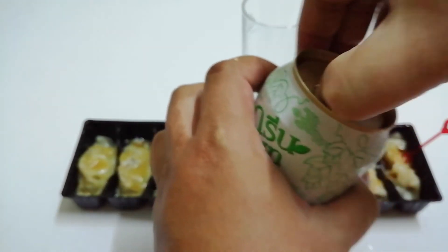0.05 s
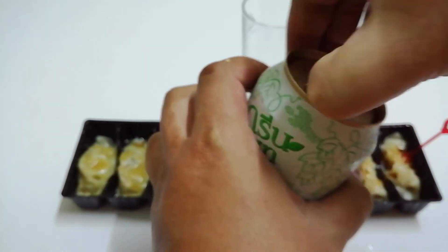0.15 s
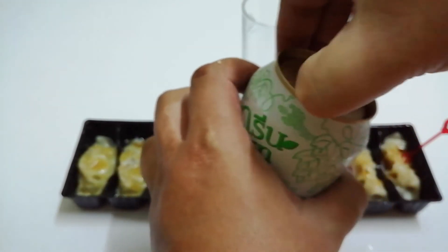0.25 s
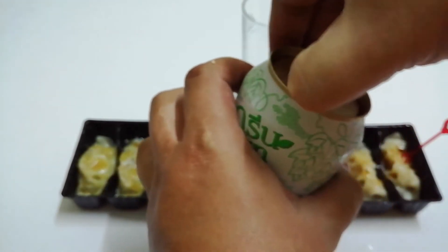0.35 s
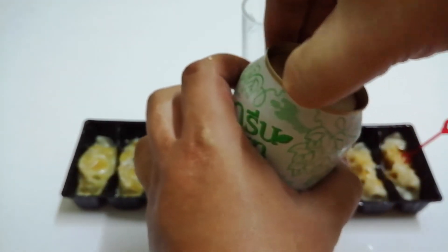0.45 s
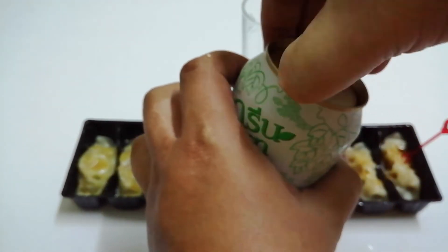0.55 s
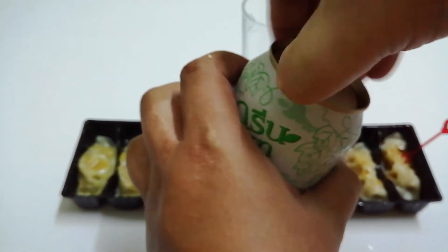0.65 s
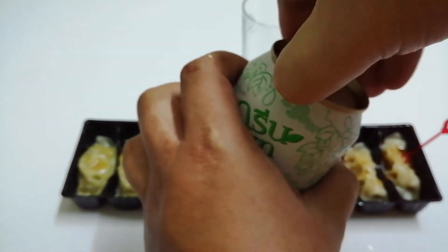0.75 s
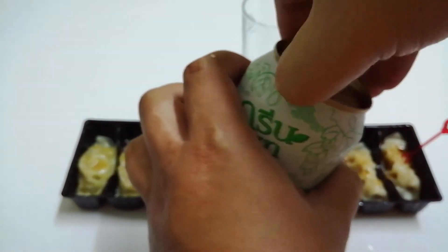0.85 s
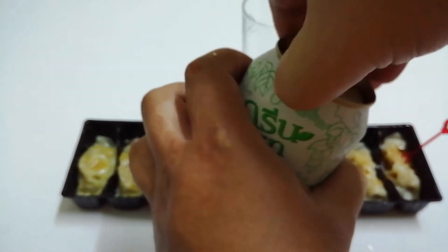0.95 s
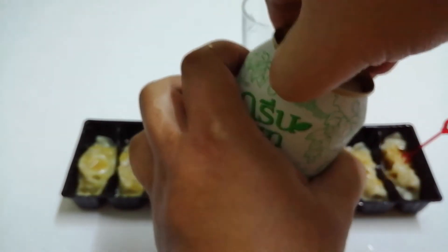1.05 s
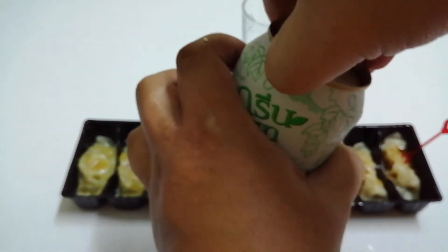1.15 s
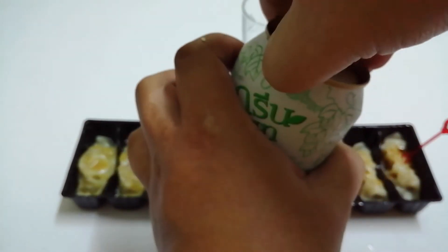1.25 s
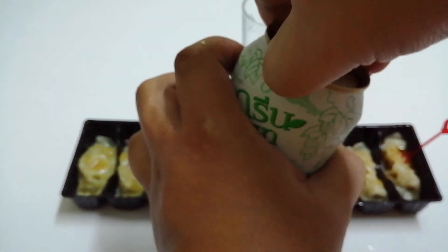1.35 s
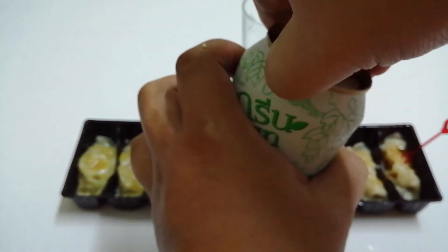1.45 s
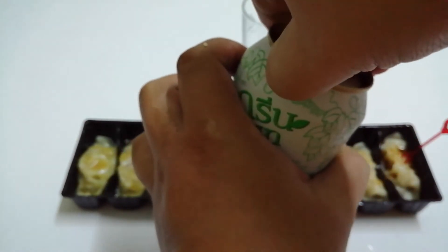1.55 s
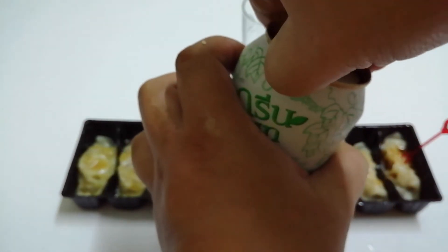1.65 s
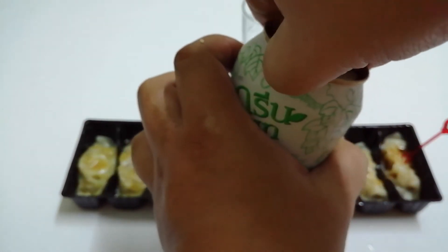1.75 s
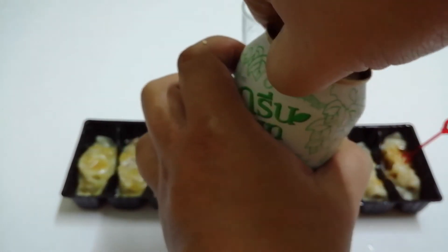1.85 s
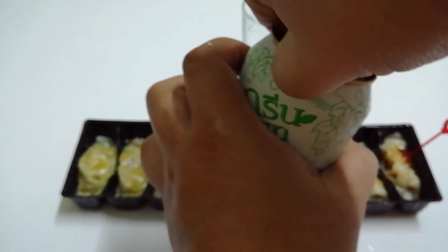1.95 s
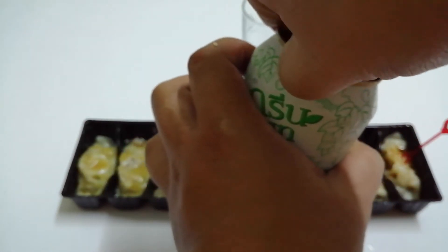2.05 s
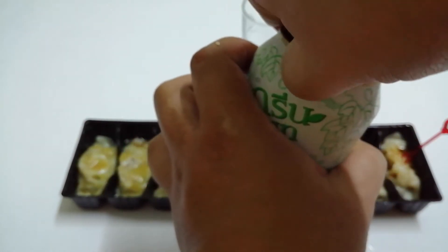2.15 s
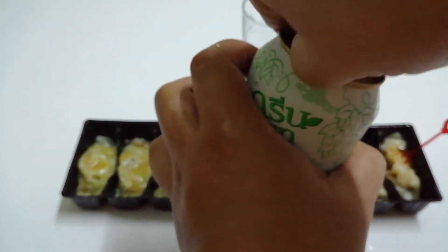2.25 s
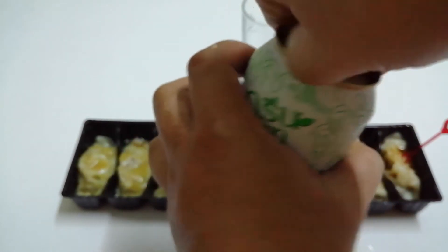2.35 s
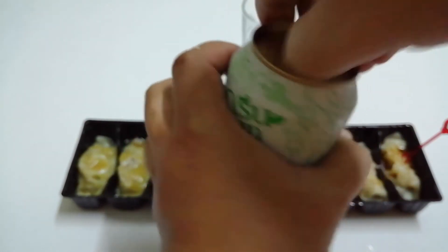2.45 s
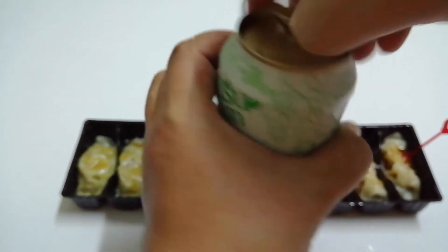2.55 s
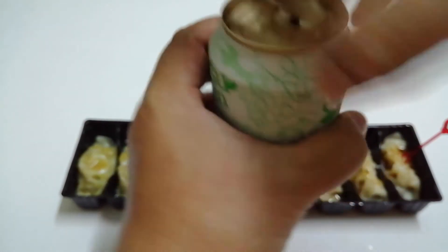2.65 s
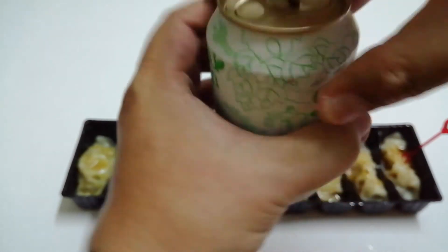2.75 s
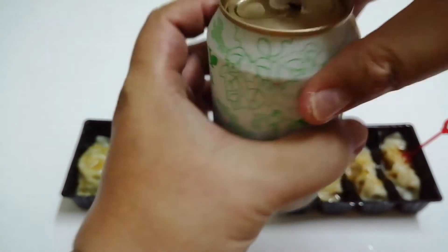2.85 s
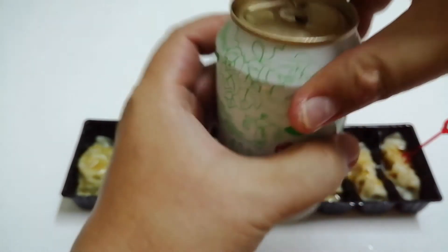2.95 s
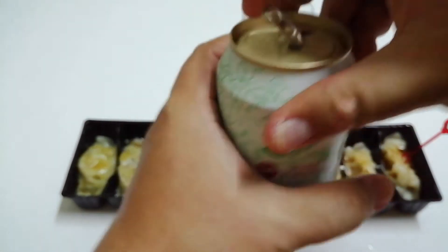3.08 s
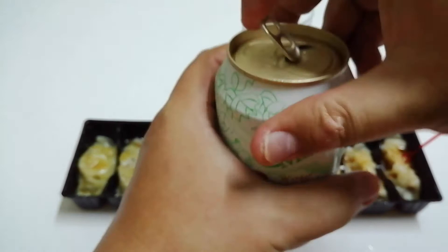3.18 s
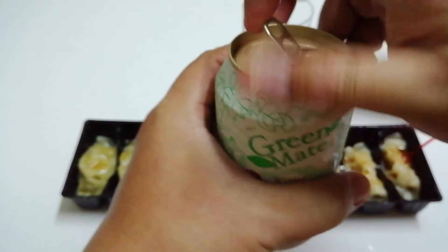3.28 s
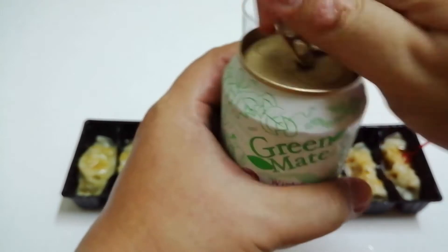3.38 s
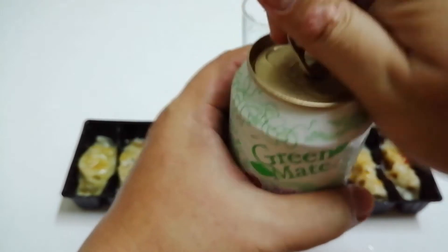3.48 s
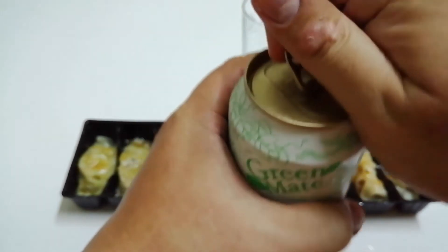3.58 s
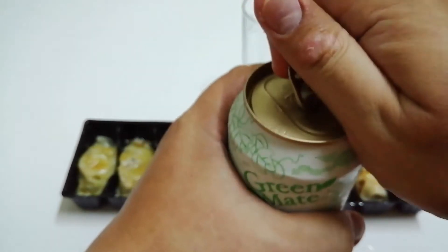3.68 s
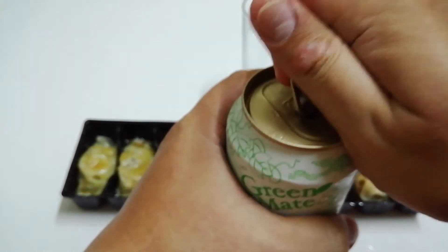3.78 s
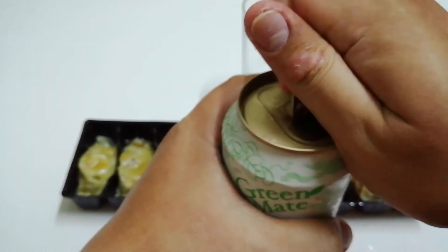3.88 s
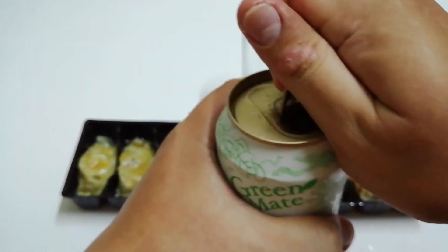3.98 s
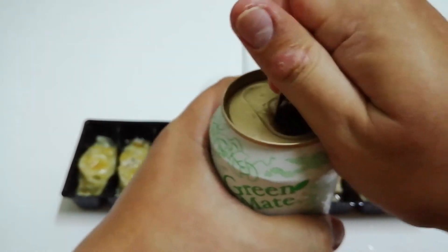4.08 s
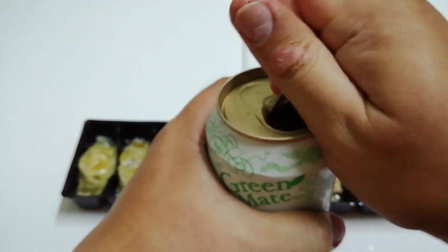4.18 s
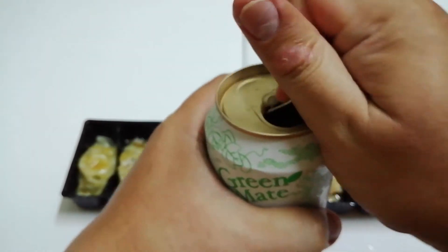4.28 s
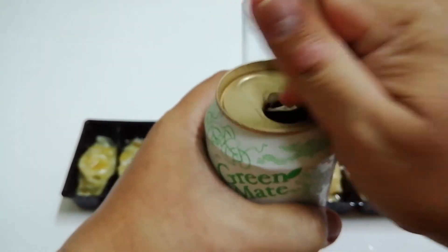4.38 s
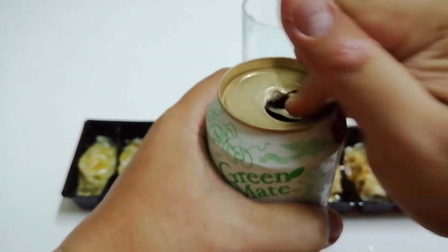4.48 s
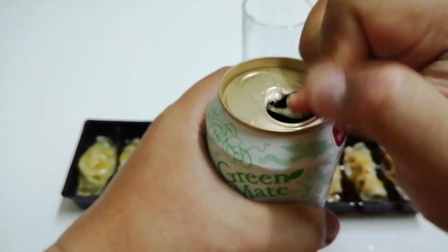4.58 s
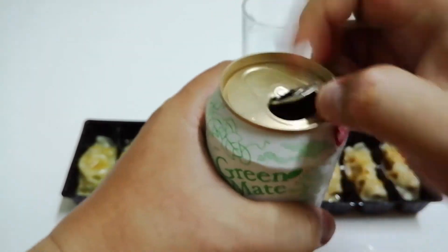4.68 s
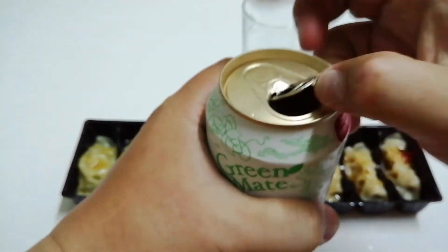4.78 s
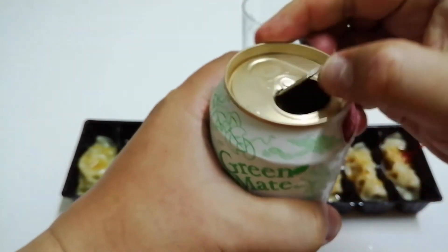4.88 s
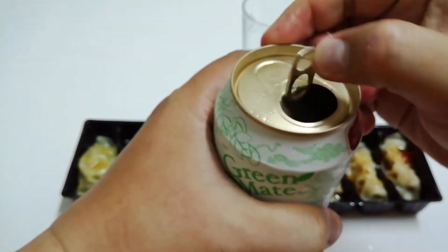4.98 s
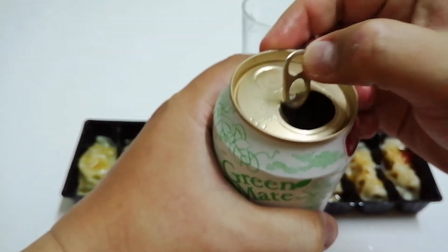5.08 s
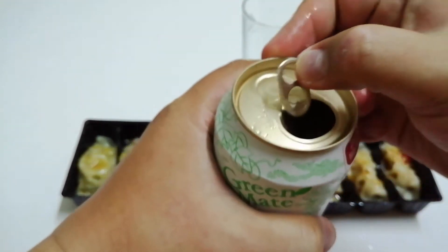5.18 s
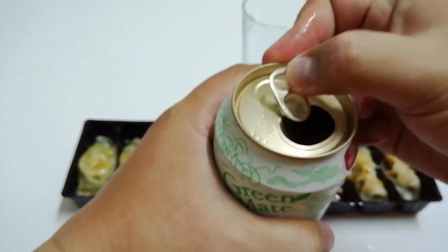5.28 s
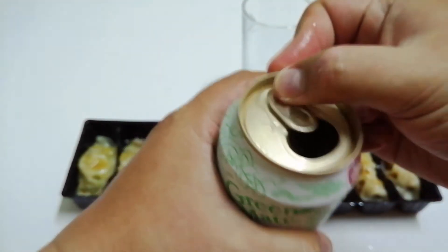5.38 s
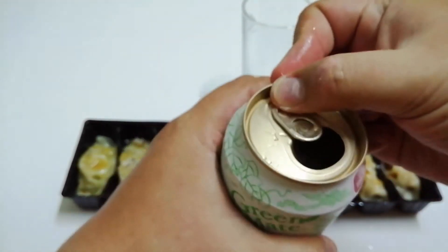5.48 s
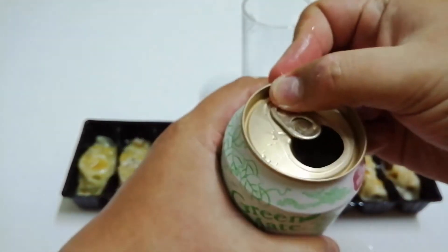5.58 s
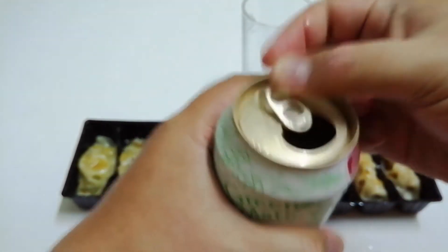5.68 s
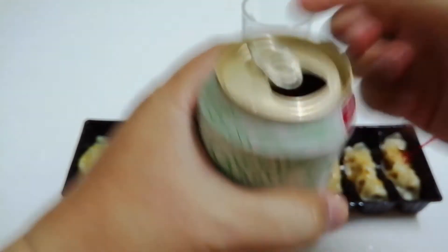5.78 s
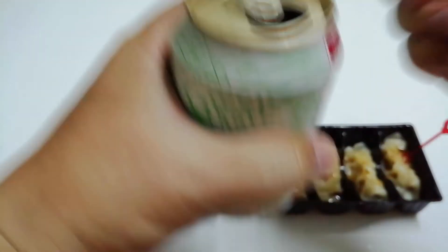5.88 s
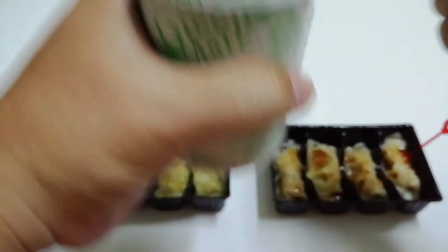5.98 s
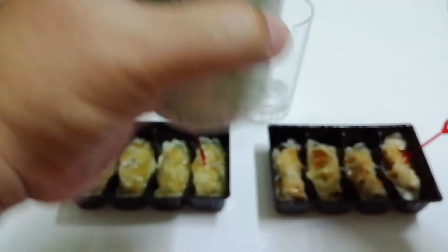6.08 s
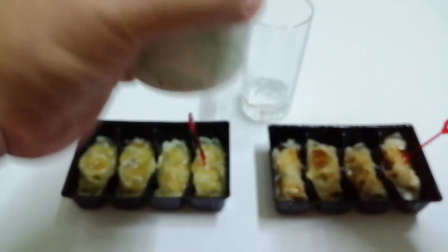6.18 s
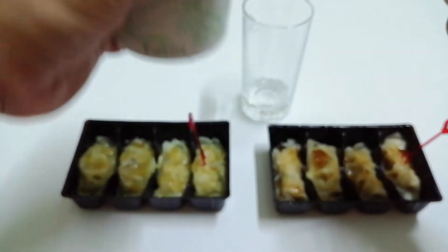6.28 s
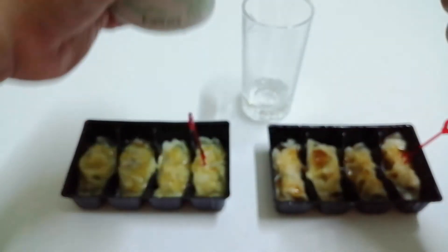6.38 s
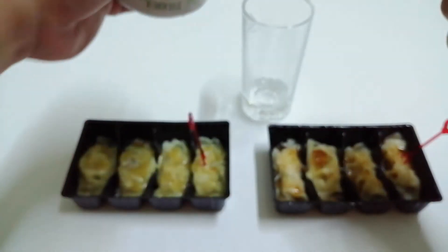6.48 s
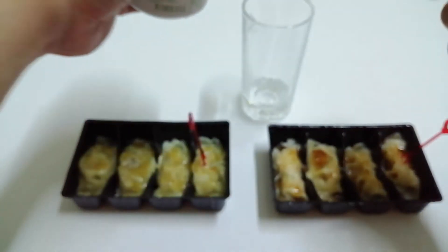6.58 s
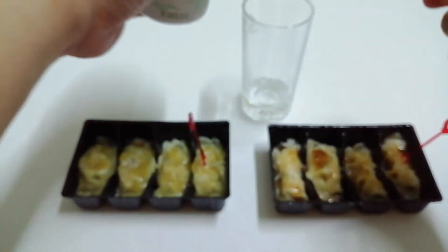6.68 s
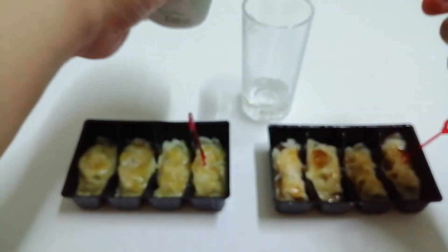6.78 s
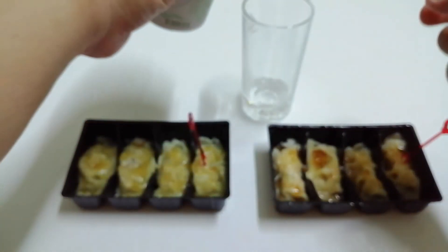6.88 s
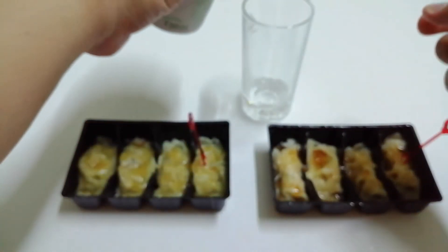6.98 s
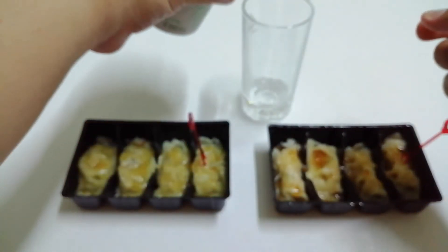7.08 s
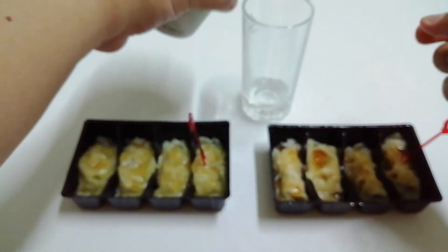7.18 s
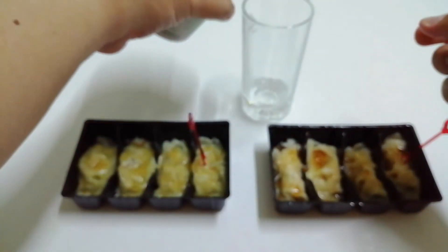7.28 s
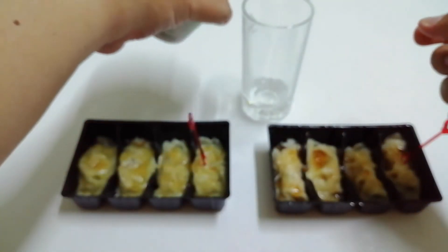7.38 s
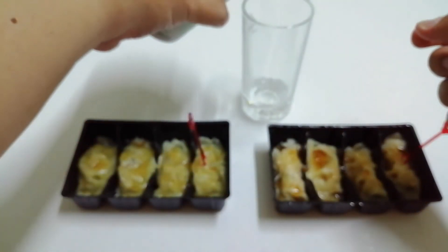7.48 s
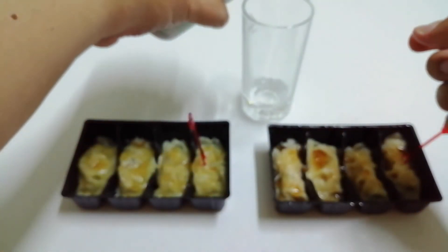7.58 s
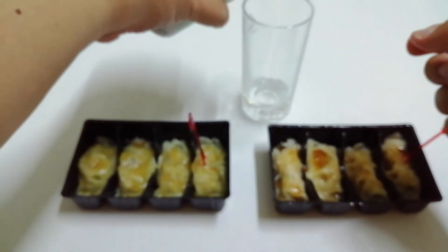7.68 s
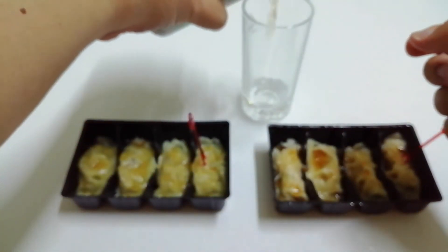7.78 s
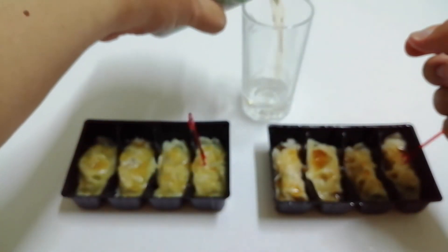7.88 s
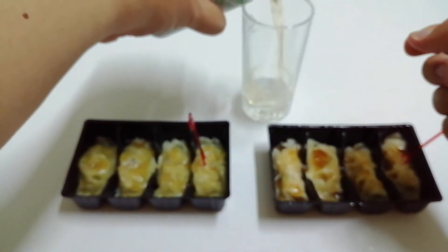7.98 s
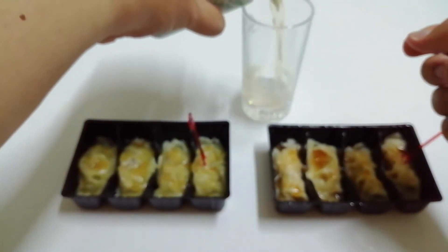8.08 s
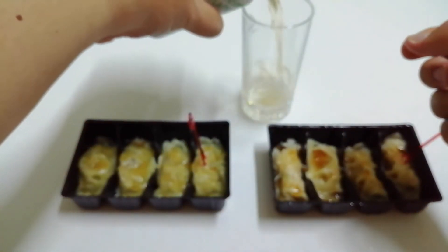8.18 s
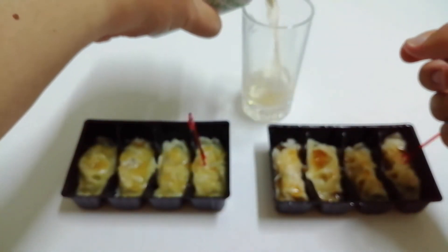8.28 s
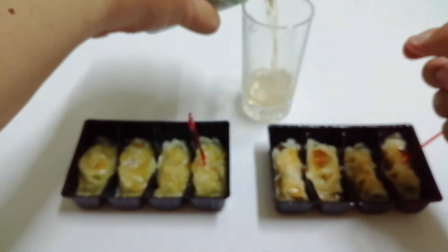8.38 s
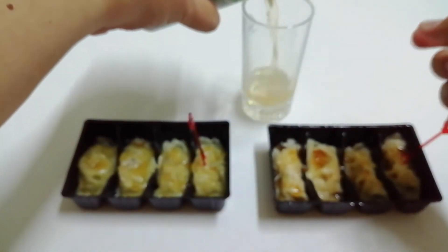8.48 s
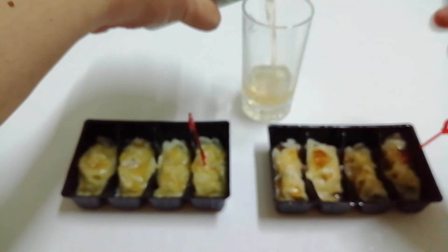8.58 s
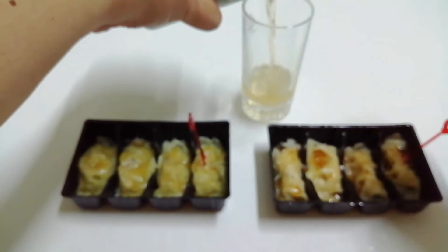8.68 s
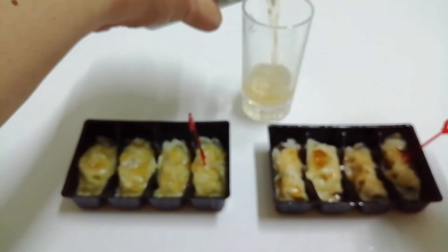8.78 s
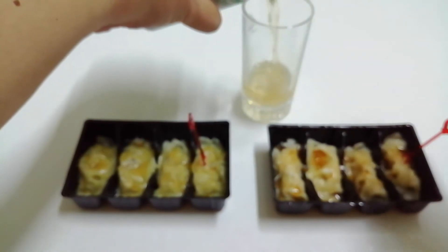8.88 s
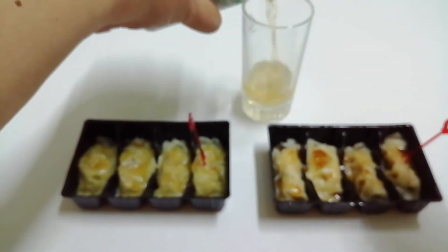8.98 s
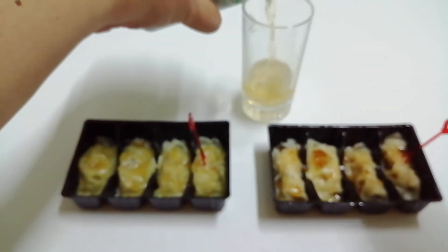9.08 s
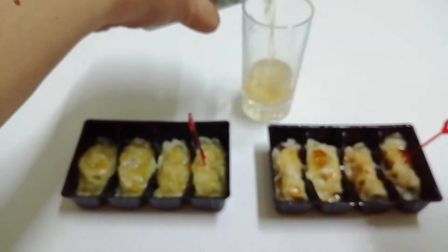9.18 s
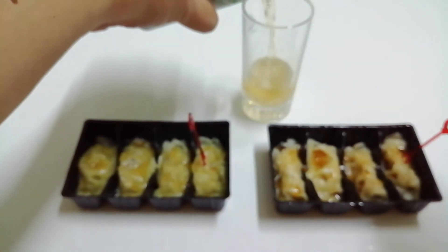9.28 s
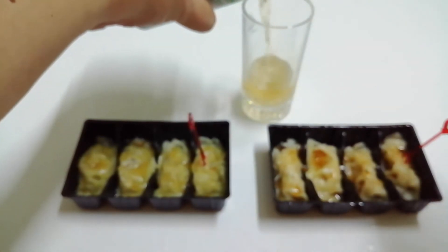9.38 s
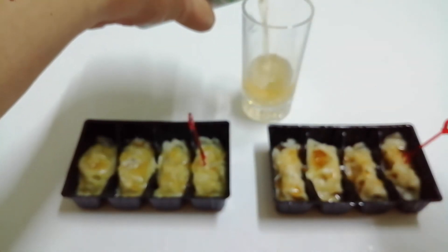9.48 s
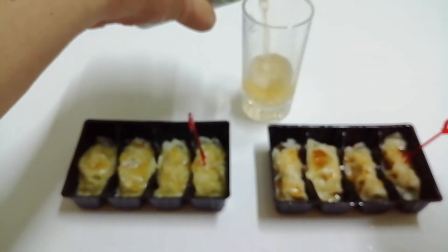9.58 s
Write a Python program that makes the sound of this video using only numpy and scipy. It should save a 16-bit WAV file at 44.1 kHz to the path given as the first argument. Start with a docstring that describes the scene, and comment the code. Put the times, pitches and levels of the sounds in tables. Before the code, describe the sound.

A drink can's seal snaps with a loud double pop and gas spurt, its lid tears open, then liquid glugs and splashes into a glass.

```python
"""Fingers work the ring tab of a drink can: noise bursts excite the lid's resonances, and each also rings
the air pocket. The seal pops twice with gas jets of shaped noise, then the lid tears in small cracks and rasps.
The drink glugs out as swelling sines and splashes into a tall glass as decaying bubble tones, noise splats
and fizz. Filtered-noise hum and hiss lie underneath, and decaying noise tails answer as a small quiet room."""
import sys
import numpy as np
from scipy import signal
from scipy.fft import rfft, irfft, next_fast_len
from scipy.io import wavfile
from scipy.ndimage import map_coordinates

SR = 44100
rng = np.random.default_rng(int(sys.argv[2]) if len(sys.argv) > 2 else 0)


def natural_amplitude(level_db):
    """Convert a level in decibels to a linear amplitude factor, elementwise."""
    exponent = np.asarray(level_db, float) / 20
    return 10 ** exponent


def master(y):
    """Save y as 16-bit WAV."""
    cut = np.clip(np.atleast_2d(y).T, -1, 1)
    pcm = np.round(cut * 32767)  # scale
    wavfile.write(sys.argv[1], SR, pcm.astype(np.int16))


N = 425124
T = np.arange(N) / SR  # time in s

# The seal gives. Each row: start in seconds, crack level in dB, left over right in dB,
# pressure thump level in dB, gas jet level in dB.
SEAL_POPS = [(2.2242, 1.5, 7, -18.5, -21.5), (2.2736, -5, 11.5, -26, -23.5)]
# The pouring stream. Each row: time in seconds, nominal spray level in dB, nominal gurgle level in dB.
POUR_STREAM = [(8.059, -76.5, -72), (8.202, -57, -111), (8.441, -49.5, -45.5), (8.55, -49.5, -40),
               (8.83, -45.5, -30.5), (8.97, -53.5, -43), (9.139, -49.5, -45), (9.261, -44, -40.5),
               (9.4, -51.5, -46.5), (9.519, -45.5, -42), (9.64, -48.5, -37.5)]
# Spectrum of the spray. Each row: frequency in Hz, relative spectral density in dB.
SPRAY_SPECTRUM = [(710, -68), (1200, -6), (1720, -12.5), (2600, -3), (4130, -11), (5900, 0.5), (7490, -14),
                  (9310, -4), (15000, -18), (16000, -26)]
# Resonances of the filling glass and table. Each row: centre in Hz, single-pass width in Hz, relative level in dB.
GLASS_MODES = [(112, 75, -1), (257, 50, 3.5), (507, 157, 1), (966, 93, 7), (1268, 120, -3)]
SMALL_HZ = 2204  # base pitch of the small drops


def unit(x):
    """Normalisation: scales a signal to rms 1."""
    return x / np.sqrt(np.mean(x ** 2) + 1e-20)


def along(points, hz):
    """Logarithmic frequency scale: interpolates (Hz, value) points along it."""
    f, v = np.transpose(points)
    return np.interp(np.log(hz + 1), np.log(f + 1), v)


def gains(rows):
    """Amplitude envelopes: one gain per sample for each dB column, practically silent outside the rows."""
    s, *columns = np.transpose(rows)
    return [natural_amplitude(np.interp(T, s, column, -150, -150)) for column in columns]


def wobble(rate):
    """Band-limited fluctuation: a smooth random curve with rate knots a second."""
    return map_coordinates(rng.standard_normal(int(N * rate / SR) + 4), [T * rate])


def flutter(depth, rate, size):
    """Amplitude modulation: fast random swells about 1 that blur a pure ring."""
    knots = rng.standard_normal(int(size * rate / SR) + 4)
    return 1 + depth * map_coordinates(knots, [T[:size] * rate])


def filtered(x, response):
    """Linear filtering: multiplies the spectrum by a complex response of frequency."""
    m = next_fast_len(x.shape[-1] + 8192)
    return irfft(rfft(x, m) * response(np.fft.rfftfreq(m, 1 / SR)), m)[..., :x.shape[-1]]


def peaks(table):
    """Modal superposition: causal second-order resonances summed with alternating sign."""
    def response(f):
        total = 0
        for k, (centre, width, db) in enumerate(table):
            damping = 1j * f * width
            total = total + (-1) ** k * natural_amplitude(db) * damping / (centre * centre - f * f + damping)
        return total
    return response


def steep(table):
    """Cascaded resonance: each mode acts twice, leaving deep valleys between modes."""
    return lambda f: sum(natural_amplitude(db) * peaks([(c, w, 0)])(f) ** 2 for c, w, db in table)


def pair(alike):
    """Interaural coherence: stereo noise whose left-right likeness depends on frequency."""
    def mid_side(hz):
        turn = np.arccos(np.clip(along(alike, hz), -1, 1)) / 2
        return np.array([np.cos(turn), np.sin(turn)])
    mid, side = filtered(rng.standard_normal((2, N)), mid_side)
    return np.array([mid + side, mid - side])


def coloured(x, spectrum):
    """Spectral shaping: imposes a (Hz, dB) spectrum, then scales to rms 1."""
    return unit(filtered(x, lambda hz: natural_amplitude(along(spectrum, hz))))


def ring(hz, t60, rise, t):
    """Damped free vibration: a decaying sine with a soft start, peak near 1."""
    shape = natural_amplitude(-60 * t / t60) * (1 - np.exp(-t / rise))
    return shape / shape.max() * np.sin(2 * np.pi * hz * t)


def add(out, s, x, pan_db):
    """Superposition: mixes a sound in at a time, with a left-over-right level difference."""
    k = round(s * SR)
    out[:, k:k + x.shape[-1]] += (x * natural_amplitude([[pan_db / 2], [-pan_db / 2]]))[:, :N - k]


def sparks(rate, spread_db, alike):
    """Poisson-like impulse noise: random stereo impulses with a long tail of sizes."""
    size = (rng.random(N) < rate / SR) * natural_amplitude(spread_db * rng.exponential(size=N))
    return size * pair([(1000, alike)])


def bubbles(rate, centre_hz, spread, cycles, size_db):
    """Bubble resonance: many short damped tones, each rising a little, each on its own side."""
    start = POUR_STREAM[0][0] * SR / N
    count = int(rate * (1 - start) * N / SR)
    at, pitch, size, side = rng.random((4, count))
    hz = np.clip(centre_hz * np.exp(spread * rng.standard_normal(count)), 600, 15000)[:, None]
    t = T[:400]
    u = t * hz / cycles
    tones = u * np.exp(-4 * u) * np.sin(2 * np.pi * hz * t * (1 + 0.013 * u * pitch[:, None]))
    tones *= natural_amplitude(np.minimum(-size_db * np.log(size), 3 * size_db))[:, None]
    first = ((start + (1 - start) * at) * N).astype(int)
    k = (first[:, None] + np.arange(len(t))).ravel()
    sides = [np.bincount(k, (tones * g[:, None]).ravel(), N + len(t))[:N] for g in (side, 1 - side)]
    return unit(np.array(sides))


def crack_and_pocket(hz, treble_db, mids_db, rise):
    """Impulsive excitation: one noise burst drives the lid's modes and the air pocket's resonance."""
    # Broad lid resonances. Each row: nominal centre in Hz, single-pass width in Hz, relative level in dB.
    lid_modes = [(1507, 480, -6.5), (2372, 660, -5), (3118, 750, 0.5), (4500, 370, -7), (5760, 1250, 8)]
    # The lid's treble resonances. Each row: centre in Hz, width in Hz, relative level in dB.
    lid_treble = [(9630, 500, 4), (11800, 380, -5.5), (14900, 3400, -11.5)]
    mids_hz = 4000  # mids_db acts below this
    grip_shift = 0.015  # random share by which the grip shifts the lid's resonances
    treble_side_db = -13  # the treble sits further right than the body
    t = T[:SR // 4]
    shared, own = rng.standard_normal(len(t)), rng.standard_normal((2, len(t)))
    decay = natural_amplitude(-60 * t / 0.011) + 0.033 * natural_amplitude(-60 * t / 0.11)
    burst = (shared + 0.36 * own) * decay * (1 - np.exp(-(t / rise) ** 2))
    held = np.exp(grip_shift * rng.standard_normal(len(lid_modes)))
    modes = [(c * h, w, g + mids_db * (c < mids_hz)) for (c, w, g), h in zip(lid_modes, held)]
    body, top = filtered(burst, steep(modes)), filtered(burst, peaks(lid_treble))
    top_gain = natural_amplitude(treble_db + treble_side_db * np.array([[0.5], [-0.5]]))
    crack = body / np.abs(body.mean(0)).max() + top_gain * top / np.abs(top.mean(0)).max()
    # the drink keeps the pocket restless
    slosh = filtered(shared * natural_amplitude(-60 * t / 0.14), steep([(hz, 0.12 * hz, 0)]))
    pocket = ring(hz, 0.03, 0.0035, t) + 0.4 * slosh / np.abs(slosh).max()
    return crack, pocket


def cracks():
    """Coupled resonators: ticks, pops, tears and knocks excite lid and air pocket together."""
    # Pitch of the air pocket as the lid opens and the can tilts. Each row: time in seconds, frequency in Hz.
    opening = [(2.48, 1301), (3.88, 779), (3.94, 778), (4.05, 866), (4.18, 963), (4.3, 1072), (4.52, 1087),
               (5.44, 1084), (5.75, 1030), (6.11, 860)]
    # Nail ticks on tab and rim. Each row: start in seconds, crack level in dB, left over right in dB.
    ticks = [(0.5531, -43, 38.5), (1.07, -47, 15.5), (1.554, -48, 18.5), (3.3683, -39.5, 20.5),
             (7.0092, -45, 10), (7.0574, -38, 11.5), (7.2775, -25, 5.5)]
    # The score line tears. Each row: start in seconds, crack level in dB, air pocket over the crack in dB.
    tears = [(3.8812, -36.5, -30.5), (3.9057, -27, -23), (3.912, -28.5, -26), (3.922, -23.5, -33),
             (3.9415, -11, -8.5), (4.005, -27.5, -11.5), (4.0521, -35.5, -6.5), (4.1688, -39.5, -22),
             (4.1768, -33.5, -5), (4.2015, -41, -1), (4.217, -34, 2), (4.2294, -37.5, -4),
             (4.2514, -39.5, -15), (4.262, -41, -14), (4.273, -38.5, -3), (4.2796, -35, -4.5),
             (4.292, -34, -4.5), (4.298, -28.5, -5.5), (4.303, -30, -10), (4.3858, -38.5, -7.5)]
    # Brighter as the hole widens. Each row: pocket pitch in Hz, treble level in dB.
    tear_treble = [(780, 0), (1000, 6.5)]
    # And thinner in the lid's lower modes. Each row: pocket pitch in Hz, level of those modes in dB.
    tear_mids = [(780, 5), (1000, -1.5)]
    # The tab knocks on the can. Each row: start in seconds, crack level in dB, air pocket over the crack in dB,
    # left over right in dB, level of the lid's lower modes in dB.
    knocks = [(2.479, -32, -18, 11, 8), (4.514, -38.5, 4.5, 7.5, 8), (4.724, -26, 5.5, 3.5, 7.5),
              (4.756, -41, 3, 9, 7), (5.434, -18.5, -13.5, 5.5, 8.5), (5.75, -33.5, -6, 22.5, 1.5),
              (6.109, -43, 0.5, 14, 8.5)]
    tick, pop = (-5, -2.1, 0.00128), (-6.5, 0, 0.00053)  # treble dB, lower modes dB, rise s
    knock_treble_db, knock_rise_s = -5.5, 0.0021
    tear_rise_s, tear_side_db = 0.0027, 4.5
    shut_pocket_db = -47.5  # the pocket hardly answers ticks and pops
    lead_s, lead_db = 0.0051, -26  # a much weaker copy of each knock comes just before it

    def pocket_hz(s):
        return np.interp(s, *np.transpose(opening))

    blows = [(s, db, *tick, shut_pocket_db, pan_db) for s, db, pan_db in ticks]
    blows += [(s, db, *pop, shut_pocket_db, pan_db) for s, db, pan_db, *_ in SEAL_POPS]
    for s, db, air_db in tears:
        treble_db, mids_db = along(tear_treble, pocket_hz(s)), along(tear_mids, pocket_hz(s))
        blows.append((s, db, treble_db, mids_db, tear_rise_s, air_db, tear_side_db))
    for s, db, air_db, pan_db, mids_db in knocks:
        for early, soft_db in ((0, 0), (lead_s, lead_db)):
            blows.append((s - early, db + soft_db, knock_treble_db, mids_db, knock_rise_s, air_db, pan_db))
    out = np.zeros((2, N))
    for s, db, treble_db, mids_db, rise, pocket_db, pan_db in blows:
        crack, pocket = crack_and_pocket(pocket_hz(s), treble_db, mids_db, rise)
        add(out, s, natural_amplitude(db) * crack, pan_db)
        add(out, s, natural_amplitude(db + pocket_db) * pocket, 0.32 * pan_db + 3.0)
    return out


def wall_rings():
    """Modal beating: the grip lets a few wall lines ring, each a cluster of close modes."""
    # Lines of the can wall. Each row: centre in Hz, t60 in seconds, spread of its close modes in Hz.
    wall_lines = [(743, 0.45, 3.1), (3080, 0.42, 120), (3570, 0.33, 81), (940, 0.21, 2.3)]
    # When a line rings. Each row: start in seconds, line number from 0, nominal level in dB.
    wall_events = [(4.303, 2, -44.5), (4.725, 1, -66), (5.752, 0, -48), (5.752, 2, -55.5),
                   (5.753, 3, -47.5), (6.111, 1, -55.5)]
    out, t = np.zeros((2, N)), T[:SR // 4]
    for s, line, db in wall_events:
        hz, t60, spread_hz = wall_lines[int(line)]
        cluster = hz + spread_hz * rng.standard_normal(size=8)
        modes = sum(ring(c, t60, 0.005, t) for c in cluster)
        add(out, s, natural_amplitude(db - 14) * flutter(0.89, 0.0613 * hz, len(t)) * modes, 4)
    return out


def pressure_thumps():
    """Pressure release: each pop is a quick push of air, then the slow swing back."""
    out, t = np.zeros((2, N)), T[:SR // 4]
    for s, *_, db, _ in SEAL_POPS:
        swing_back = 0.04 * t / 0.058 * np.exp(-(t / 0.1) ** 2)
        push = (t / 0.001) * np.exp(1 - t / 0.00084)
        add(out, s, natural_amplitude(db) * (swing_back - push), 9)
    return out


def gas_jets():
    """Turbulent jet noise: gas whistles through the slit, then a leak fades after the last pop."""
    # Spectrum of the gas. Each row: frequency in Hz, relative spectral density in dB.
    gas_spectrum = [(350, -47.5), (700, -26.5), (1400, -19.5), (2300, -14), (3250, -17), (4050, -28.5),
                    (5630, 3), (6730, -21), (9360, -13), (16000, -20.5)]
    jet_s, close_s = [0.042, 0.02], [0.009, 0.013]  # each jet's full length, its closing time
    leak_db, leak_db_per_s = -32.5, 109.5
    gas = 0
    for (s, *_, db), lasts, close in zip(SEAL_POPS, jet_s, close_s):
        gas = gas + natural_amplitude(db) * (T > s) * np.clip((s + lasts - T) / close, 0, 1)
    since = T - SEAL_POPS[-1][0]
    gas = gas + (since > 0) * natural_amplitude(leak_db - leak_db_per_s * np.abs(since))
    jet = coloured(pair([(1000, 0.7), (8000, 0.09)]) * natural_amplitude(1.6 * wobble(120)), gas_spectrum)
    return gas * jet * natural_amplitude([[2.5], [-4]])


def tear_rasp():
    """Fracture noise: pulls on the tab tear the scored metal in a gritty rasp of noise and impulses."""
    # Spectrum of the rasp. Each row: frequency in Hz, relative spectral density in dB.
    rasp_spectrum = [(350, -32.5), (600, -18), (801, -1), (1410, -12.5), (5710, -7.5), (8160, -12),
                     (9890, -11), (16000, -21.5)]
    # Pulls that build and die. Each row: peak time in seconds, nominal level in dB, build-up time constant
    # in seconds, t60 in seconds.
    pulls = [(3.945, -30.5, .012, 0.4), (4.3, -42.5, 0.032, 0.28)]
    tear = 0
    for s, db, build, t60 in pulls:
        away = np.abs(T - s)
        tear = tear + natural_amplitude(db) * np.where(T < s, np.exp(-away / build), natural_amplitude(-60 * away / t60))
    grit = pair([(1000, 0.11), (8000, 0.25)]) + 3 * sparks(870, 0.65, 0.39)
    return tear * coloured(grit, rasp_spectrum) * natural_amplitude([[-1.5], [-0.6]])


def rubs():
    """Friction noise: soft swells of narrow noise from fingers shifting their grip."""
    # Skin rubbing on the can. Each row: swell centre in seconds, swell width in seconds, level in dB,
    # centre frequency in Hz.
    skin_rubs = [(1.97, 0.21, -64, 658), (5.028, 0.017, -57, 1150), (7.062, 0.027, -58, 2270),
                 (7.092, 0.05, -56.5, 5000)]
    out = 0
    for s, length, db, hz in skin_rubs:
        noise = unit(filtered(pair([(1000, 1.0)]), peaks([(hz, 0.083 * hz, 0)])))
        out = out + natural_amplitude(db) * np.exp(-((T - s) / length) ** 2) * noise
    return out


def gulps():
    """Air-cavity oscillation: each gulp of air into the can is a sine that swells, shrinks and glides."""
    # Gulps. Each row: start in seconds, level in dB, nominal pitch in Hz.
    gulp_rows = [(8.47, -20.5, 948), (8.49, -22, 849), (8.511, -15.5, 842), (8.536, -18, 856),
                 (8.555, -22, 841), (8.605, -15.5, 860), (8.631, -11.5, 940), (8.647, -24.5, 900),
                 (8.687, -19.5, 882), (8.724, -26.5, 930), (8.741, -14.5, 881), (8.783, -29, 785),
                 (8.796, -19.5, 890), (8.819, -22, 832), (8.834, -17, 806), (8.883, -22.5, 804)]
    glide_per_s = 4  # scales a random glide, up or down
    out, t = np.zeros((2, N)), T[:SR // 4]
    for s, db, hz in gulp_rows:
        u = t / 0.0057 + 0.47
        glide = 1 + glide_per_s * rng.normal() * (t - 0.01)
        swell = (u * np.exp(1 - u)) ** 6.8 * np.sin(2 * np.pi * hz * t * glide)
        after = 0.12 * flutter(0.98, 90, len(t)) * ring(hz, 0.15, 0.023, t)
        add(out, s, natural_amplitude(db) * (swell + after), 1.7)
    return out


def drops():
    """Bubble resonance: each drop on glass and drink is a short tone on a narrow splat of noise."""
    # The loudest drops. Each row: start in seconds, nominal level in dB, pitch in Hz.
    loud_drops = [(8.082, -23, 5140), (8.1188, -25, 3340), (8.135, -24, 2250), (8.2641, -22, 5930),
                  (8.2852, -28, 2300), (8.363, -14.5, 5930), (8.3916, -19, 5700), (8.41, -31, 1294),
                  (8.4386, -15, 6070), (8.576, -24.5, 3580), (8.623, -20, 4250), (8.7186, -15, 5850),
                  (8.7856, -20, 2330), (8.934, -25.5, 2180), (9.083, -26.5, 2360), (9.16, -20, 4700),
                  (9.1884, -15.5, 5560), (9.2063, -14, 5730), (9.2642, -13, 4990), (9.312, -26, 1850),
                  (9.428, -29, 2280), (9.5099, -23.5, 3050), (9.548, -18, 5210), (9.618, -14.5, 5250)]
    most_rise = 0.3  # a few drops rise in pitch over their life
    out, t = np.zeros((2, N)), T[:SR // 12]
    envelope = natural_amplitude(-60 * t / 0.0107) * (1 - np.exp(-t / 0.0024))
    for s, db, hz in loud_drops + small_drops(count=150):
        t60 = 70 / hz
        bubble = ring(hz * (1 + most_rise * rng.random() ** 3 * t / t60), t60, 0.0011, t)

        def response(f):
            return peaks([(hz, 0.18 * hz, 0)])(f) ** 2 + 0.249 * natural_amplitude(along(SPRAY_SPECTRUM, f))

        splat = filtered(rng.standard_normal((2, len(t))) * envelope, response)
        tone_gain = 0.45 * min(SMALL_HZ / hz, 1)
        drop = tone_gain * bubble + 0.7 * splat / np.abs(splat).max()
        add(out, s, natural_amplitude(db) * drop, rng.normal(5, 4))
    return out


def small_drops(count):
    """Random arrivals: (s, dB, Hz) drops all through the pour that follow the spray level."""
    spread, over_spray_db, scatter_db = 0.171, 7.5, 5  # log pitch scatter, mean level, level scatter
    climb_hz_per_s = 350  # the base pitch climbs as the glass fills
    spit_hz, spit_share = 5500, 0.4  # some of them spit much higher
    s, spray_db, _ = np.transpose(POUR_STREAM)
    at = s[0] + rng.random(count) * (N / SR - s[0]) * 0.98
    db = np.interp(at, s, spray_db) + over_spray_db + scatter_db * rng.standard_normal(count)
    base_hz = np.where(rng.random(count) < spit_share, spit_hz, SMALL_HZ + climb_hz_per_s * (at - s[0]))
    return list(zip(at, db, base_hz * np.exp(spread * rng.standard_normal(count))))


def plops():
    """Cavity resonance: sharp-starting damped tones with a noise slap through the glass modes."""
    # Plops in the glass. Each row: start in seconds, nominal level in dB, pitch in Hz.
    plop_rows = [(8.952, -26, 900), (9.026, -24.5, 906), (9.065, -24, 481), (9.151, -27.5, 547),
                 (9.189, -26, 940), (9.255, -24.5, 962), (9.467, -28.5, 1243), (9.491, -24, 480)]
    out, t = np.zeros((2, N)), T[:SR // 4]
    for s, db, hz in plop_rows + small_plops(count=40):
        slap = filtered(rng.standard_normal(len(t)) * natural_amplitude(-60 * t / 0.028), steep(GLASS_MODES))
        plop = ring(hz, 20 / hz + 0.048, 0.00014, t) + 0.42 * slap / np.abs(slap).max()
        add(out, s, natural_amplitude(db) * plop, 4.5)
    return out


def small_plops(count):
    """Random arrivals: (s, dB, Hz) plops just below the upper resonances of the glass."""
    from_s, over_gurgle_db = 8.9, 5.5  # the most a plop stands over the gurgle level
    s, _, gurgle_db = np.transpose(POUR_STREAM)
    at = from_s + rng.random(count) * (N / SR - from_s) * 0.98
    db = np.interp(at, s, gurgle_db) + over_gurgle_db - 7 * rng.random(count)
    hz = np.array(GLASS_MODES)[2 + (rng.random(count) * 3).astype(int), 0]
    return list(zip(at, db, hz * (0.79 + 0.194 * rng.random(count))))


def splats():
    """Impact noise: broad bright bursts, the spray spectrum tilted up with frequency."""
    # Splats. Each row: start in seconds, level in dB before a common gain.
    splat_rows = [(8.4856, -32.5), (8.748, -28), (8.8283, -16.5), (8.9236, -26.5), (9.2329, -30),
                  (9.4908, -31.5), (9.5098, -22), (9.5572, -25.5), (9.5941, -22.5)]
    out, t = np.zeros((2, N)), T[:SR // 12]
    envelope = natural_amplitude(-60 * t / 0.012) * (1 - np.exp(-t / 0.001))
    for s, db in splat_rows:
        noise = rng.standard_normal((2, len(t))) * envelope
        splat = filtered(noise, lambda f: natural_amplitude(along(SPRAY_SPECTRUM, f)) * f / SR)
        add(out, s, natural_amplitude(db + 5.5) * splat / np.abs(splat).max(), 1.5)
    return out


def stream():
    """Turbulent excitation: fizz of noise and bubbles, and churn through the air in can and glass."""
    # Air in the tilted can, at first and as it grows. Each row: centre in Hz, single-pass width in Hz.
    pocket_modes = [(900, 180), (794, 174)]
    surge_db = 4.5  # quick surges of the fizz
    spray, gurgle = gains(POUR_STREAM)
    froth = bubbles(1600, 4223, spread=0.8, cycles=15.4, size_db=0.5)
    grains = pair([(1400, 0.86), (7000, 0.043)]) + froth + unit(sparks(260, 4.06, 0.45))
    surges = natural_amplitude(3.8 * np.tanh(wobble(28)) + surge_db * np.tanh(wobble(110)))
    fizz = coloured(grains, SPRAY_SPECTRUM) * surges
    churn = pair([(1000, 0.85)]) * natural_amplitude(5.9 * np.tanh(wobble(45)))
    early, late = (unit(filtered(churn, steep([(*mode, 0)]))) for mode in pocket_modes)
    grown = np.clip((T - 8.68) / 0.096, 0, 1)
    can = (1 - grown) * early + grown * late
    glass = unit(filtered(churn, steep(GLASS_MODES)))
    full = np.clip((T - 8.84) / 0.117, 0, 1)  # the can's gulping gives way to the glass
    return (spray * fizz + gurgle * ((1 - full) * can + full * glass)) * natural_amplitude([[1.5], [-1.5]])


def draught():
    """Low-frequency flow noise: moving hands puff air on the left port, and the pour keeps air stirring."""
    # Puffs. Each row: centre in seconds, nominal level in dB, width in seconds.
    puff_rows = [(8.192, -44.5, 0.042), (8.323, -36.5, 0.062)]
    spray, _ = gains(POUR_STREAM)
    level = natural_amplitude(-12.5) * spray  # stirring air, below the spray
    for s, db, length in puff_rows:
        level = level + natural_amplitude(db) * np.exp(-((T - s) / length) ** 2)
    spectrum = [(15, -69), (30, -5.0), (70, -13.5), (130, -24.5), (300, -62.0)]
    air = coloured(rng.standard_normal((2, N)) * natural_amplitude(1.2 * wobble(4.7)), spectrum)
    return level * air * natural_amplitude([[5], [-12]])


def room(x):
    """Diffuse reverberation: convolves with decaying noise, a new tail every third of a second."""
    # Reverberation. Each row: frequency in Hz, t60 in seconds.
    decay_times = [(1000, 0.36), (2500, 0.4), (6000, 0.45), (12000, 0.035)]
    out, step = np.zeros((2, N + 2 * SR)), SR // 3
    for k in range(0, N, step):
        hz, t, z = signal.stft(rng.standard_normal((2, SR // 2)), SR, nperseg=256)
        decay = natural_amplitude(-60 * t / along(decay_times, hz)[:, None])
        tail = signal.istft(z * decay, SR, nperseg=256)[1]
        wet = signal.fftconvolve(x[None, k:k + step], tail / np.linalg.norm(tail[0]), axes=1)
        out[:, k + 200:k + 200 + wet.shape[1]] += wet  # 200 samples of pre-delay
    return out[:, :N]


def room_tone():
    """Stationary noise: distant machinery hums in a few bands over the microphone's own hiss."""
    # Hum bands. Each row: centre in Hz, width in Hz, relative level in dB.
    hum_bands = [(104.1, 16, -2), (148, 24, -5), (201, 4.5, -2), (246.7, 15, -6), (341.7, 7, -4)]
    # Spectrum of the hiss. Each row: frequency in Hz, relative spectral density in dB.
    hiss_spectrum = [(15, -31), (25, -5), (120, -13.5), (400, -13), (1480, -22.5), (3920, -28.5),
                     (5500, -26), (6560, -15.5), (7710, -37), (9840, -29.5), (14800, -36.5), (16000, -53)]
    # Stereo coherence. Each row: frequency in Hz, left-right likeness from -1 to 1.
    likeness = [(60, 0.96), (240, 0.8), (950, 0.012), (3770, -0.024), (15000, -0.12)]
    # Stereo balance. Each row: frequency in Hz, left over right in dB.
    balance = [(60, 6), (380, 2.5), (2380, 6), (15000, -0.5)]
    # The room tone dips briefly. Each row: start in seconds, nominal depth in dB, return time constant in seconds.
    dip_rows = [(2.262, -15.5, 0.27), (3.15, -3.5, 0.82), (3.97, -13.5, 0.16)]
    fall_s = 0.05
    air = natural_amplitude(-59) * coloured(pair(likeness), hiss_spectrum)
    hum = natural_amplitude(-56.5) * unit(filtered(pair(likeness), peaks(hum_bands)))
    dip_db = 0
    for s, db, back in dip_rows:
        dip_db = dip_db + db * np.clip((T - s) / fall_s, 0, 1) * np.exp(-((T - s) / back) ** 2)
    both = natural_amplitude(dip_db) * (air + hum)
    return filtered(both, lambda hz: natural_amplitude([[0.5], [-0.5]] * along(balance, hz)))


def scene():
    """Superposition of direct and reverberant sound: the left port hears can and drink a little late."""
    can = cracks() + wall_rings() + pressure_thumps() + gas_jets() + tear_rasp() + rubs()
    drink = gulps() + plops() + drops() + splats() + stream()
    near = can + drink
    near[0] = np.roll(near[0], shift=2)  # samples
    reverb = room(natural_amplitude(-14.5) * can.mean(0) + natural_amplitude(-9.5) * drink.mean(0))
    return near + reverb + draught() + room_tone()


def top_cut(x):
    """Nothing passes above the cut-off."""
    return signal.sosfilt(signal.butter(12, 16150, fs=SR, output="sos"), x)


def record(dry):
    """Transducer response: the microphone is weaker in one band, and peaks beyond full scale clip."""
    mic_dip = (3950, 630, -6)  # centre Hz, width Hz, part taken away dB
    heard = filtered(dry, lambda hz: 1 - peaks([mic_dip])(hz))
    return top_cut(np.clip(heard, -1, 1))


dry = scene()
out = record(dry)
master(out)
```